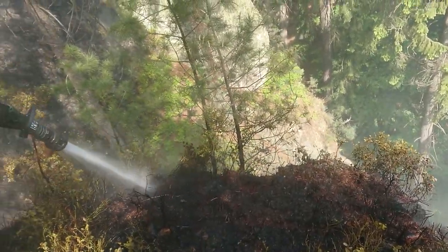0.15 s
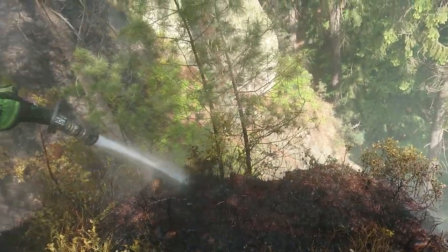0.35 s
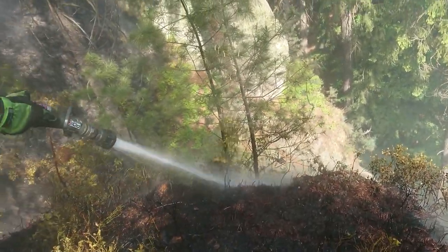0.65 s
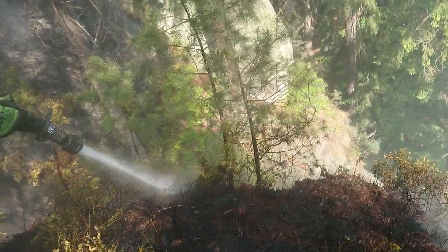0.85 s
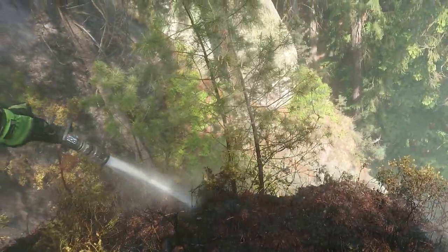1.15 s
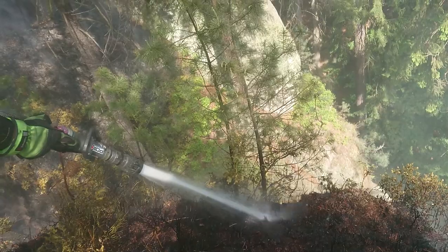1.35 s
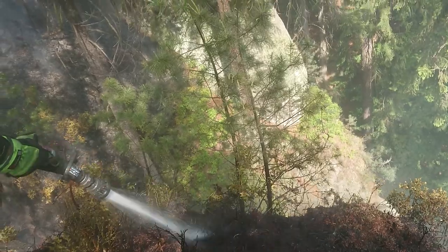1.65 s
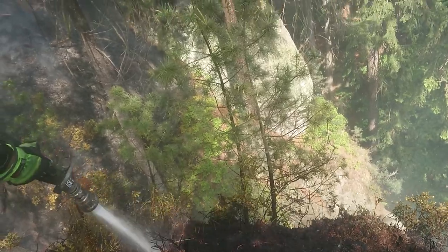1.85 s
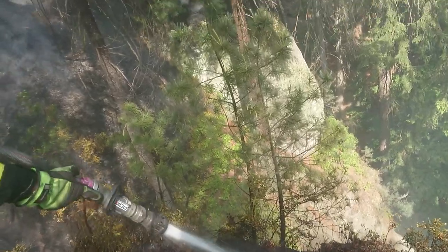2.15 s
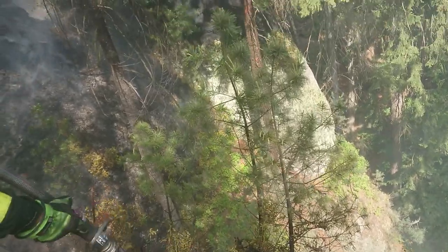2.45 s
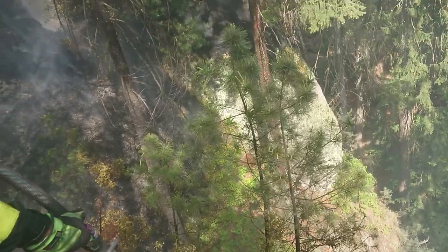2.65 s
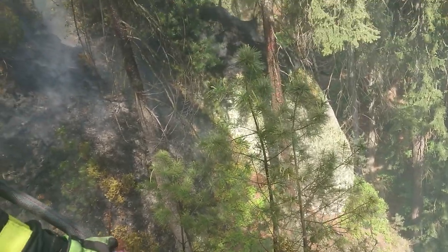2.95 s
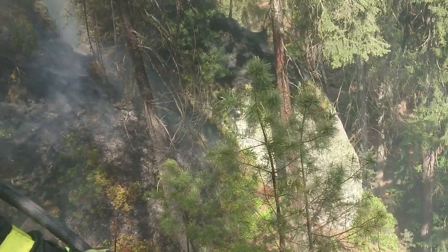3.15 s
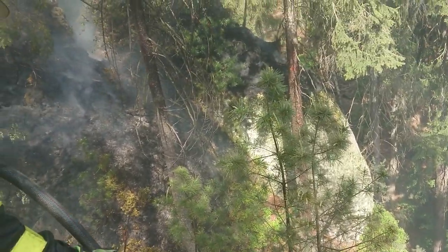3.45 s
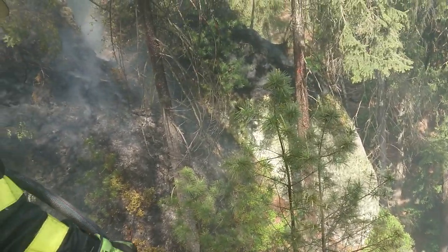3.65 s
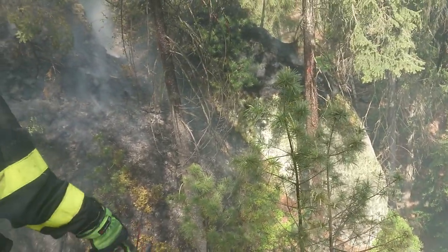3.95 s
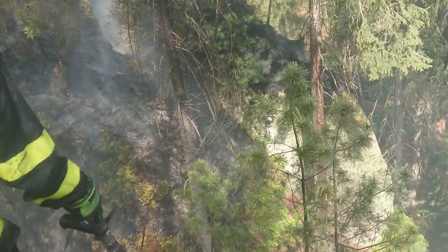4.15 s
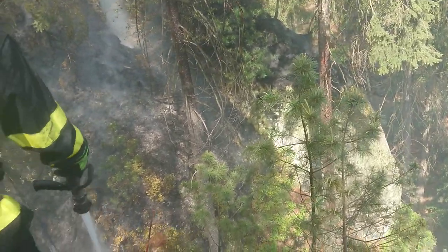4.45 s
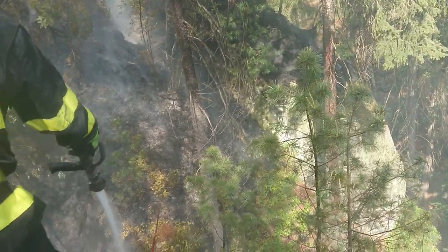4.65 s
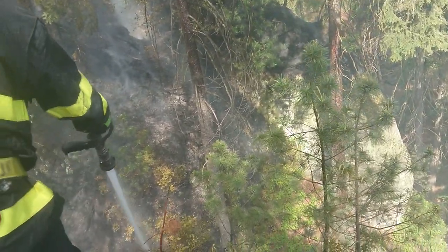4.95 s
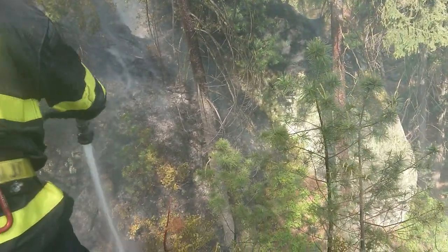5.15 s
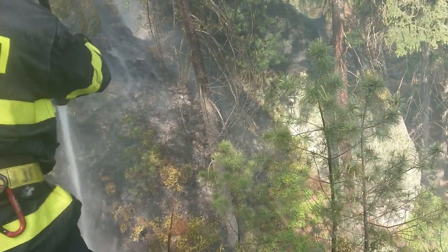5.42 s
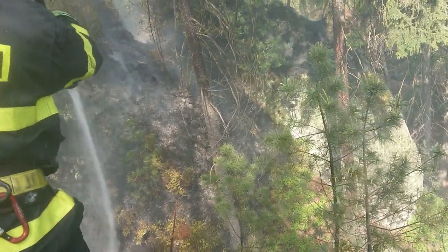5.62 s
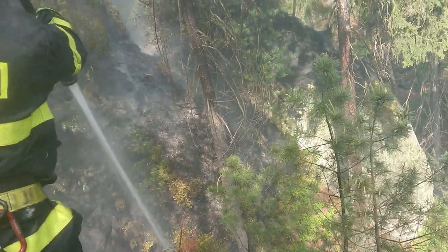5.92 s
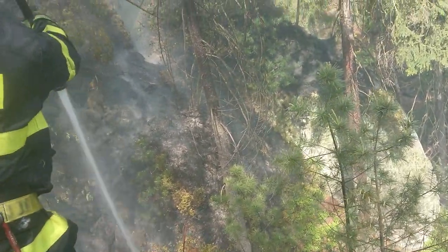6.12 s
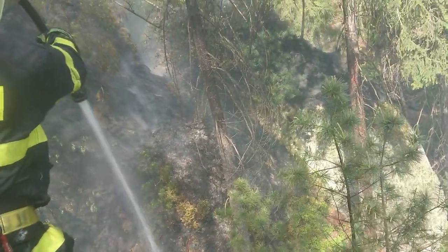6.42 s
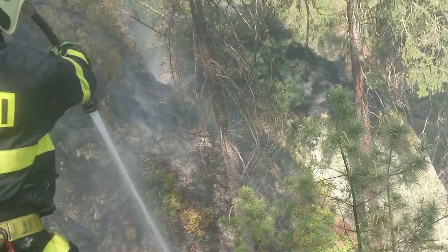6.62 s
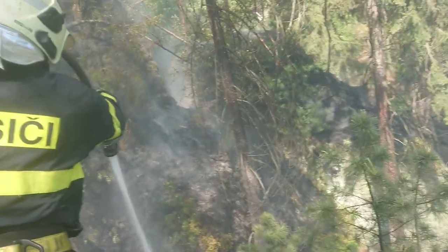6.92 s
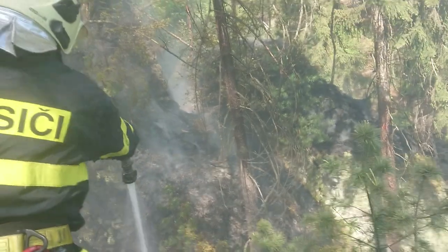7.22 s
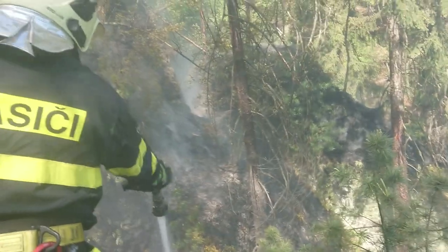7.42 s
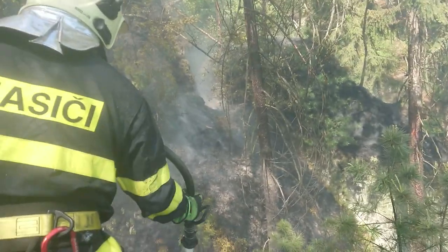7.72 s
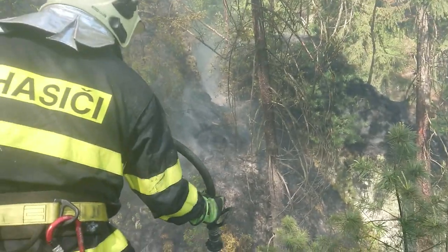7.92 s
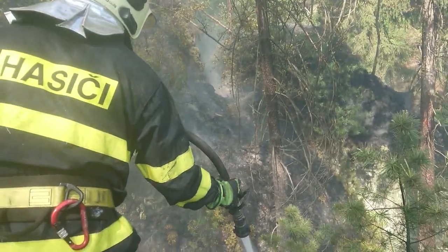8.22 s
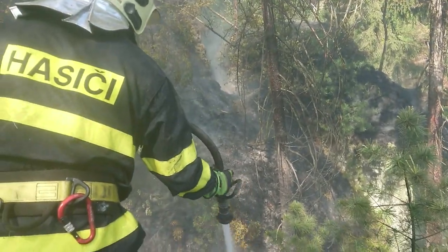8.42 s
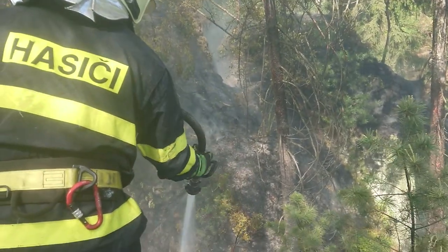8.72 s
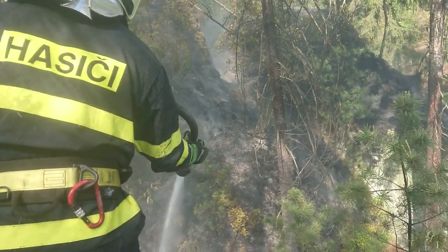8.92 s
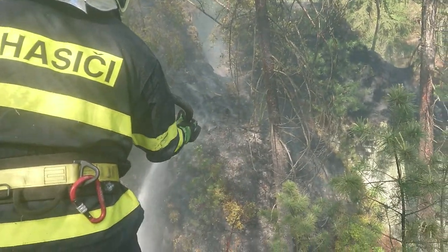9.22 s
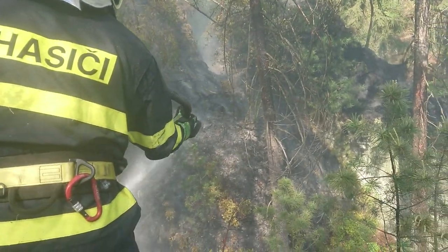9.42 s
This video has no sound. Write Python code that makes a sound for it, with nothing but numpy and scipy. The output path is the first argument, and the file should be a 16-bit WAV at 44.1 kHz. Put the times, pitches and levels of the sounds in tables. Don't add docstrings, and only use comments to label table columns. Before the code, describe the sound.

Dense broadband water rush, loud and close, tears unevenly as a firefighter sweeps the nozzle over mud, ash and brush. Around four seconds the splash recedes downhill, becoming softer and thinner, exposing a steady low motor hum that swells with the breeze. One short hollow knock on the camera housing, then crisp spitting on twigs near eight seconds. Open air, handheld camera, stereo, coloured by its housing.

```python
import sys
import numpy as np
from scipy import signal
from scipy.fft import rfft, irfft, next_fast_len
from scipy.io import wavfile
from scipy.ndimage import uniform_filter1d, map_coordinates

SR = 44100
rng = np.random.default_rng(int(sys.argv[2]) if len(sys.argv) > 2 else 0)


def rack_gain(trim_db):
    fader = np.asarray(trim_db, float)
    return 10 ** (fader / 20)


def unload_audio(sound):
    columns = np.transpose(np.atleast_2d(sound))
    steps = np.round(np.clip(columns, -1, 1) * 32767)
    wavfile.write(sys.argv[1], SR, steps.astype(np.int16))


N = 422037
FRAME = 512


def unit(x):
    return x / np.sqrt(np.mean(np.abs(x) ** 2) + 1e-20)


def columns(rows, at, scale=np.asarray):
    first, *rest = np.transpose(rows)
    return np.array([np.interp(scale(at), scale(first), column) for column in rest])


def log_hz(hz):
    return np.log(np.asarray(hz) + 1)


def wobble(rate, rows=1):
    knots = rng.standard_normal((rows, int(N * rate / SR) + 4))
    coarse = np.arange(0, N + 64, 64)
    curves = [map_coordinates(k, [coarse * rate / SR]) for k in knots]
    return columns(np.transpose([coarse, *curves]), np.arange(N))


def swing(turns, t):
    s, value = np.transpose(turns)
    place = np.interp(t, s, np.arange(len(s)))
    eased = np.floor(place) + .5 - .5 * np.cos(np.pi * (place % 1))
    return np.interp(eased, np.arange(len(s)), value)


def pumps():
    # engine order in Hz, level in dB rms.
    engine_orders = [(42.5, -67), (84, -59), (86.3, -54.5), (93, -55), (168, -61), (170.5, -65.5),
                     (196, -69), (224, -49.5), (252, -58.5), (280, -65.5), (310, -66), (392, -64)]
    # frequency in Hz, level in dB per Hz.
    drone_colour = [(25, -30), (36, -26), (44, 7.5), (100, 1.5), (200, 6), (400, -1), (800, -6.5),
                    (1600, -43)]
    # time in seconds, level in dB.
    breeze = [
        (0, 3),
        (2.5, -0.5),
        (5.2, -.5),
        (5.75, 4),
        (6.3, -2.5),
        (8.8, 1.5),
        (9.3, 4.5),
        (9.57, 3),
    ]
    apart = .45

    hz, db = np.transpose(engine_orders)
    t = np.arange(N) / SR
    drift = wobble(2, rows=len(hz))
    flutter = drift[::-1]
    level = rack_gain(db[:, None] + 1.5 + 0.29 * flutter)
    tones = level * np.sin(2 * np.pi * hz[:, None] * t + 1.17 * drift)

    m = next_fast_len(N)
    colour = rack_gain(columns(drone_colour, np.fft.rfftfreq(m, 1 / SR), log_hz)[0])
    low = unit(irfft(rfft(rng.standard_normal((3, m))) * colour, m)[:, :N])
    drone = rack_gain(-51.5 + columns(breeze, t)) * (low[0] + apart * low[1:])
    return (tones.sum(0) + drone) * rack_gain([[-2.3], [1.9]])


def knock():
    # start in seconds, peak in dB.
    taps = [
        (5.4925, -14.5),
    ]
    # frequency in Hz, level in dB, 60 dB decay in seconds.
    housing = [(373, -10, 0.077), (720, 2.5, 0.03), (1120, 1, .025), (1297, -2, 0.028), (1700, -8, 0.018),
               (2150, -6, 0.02), (2900, -11, .012)]
    out = np.zeros(N + SR)
    t = np.arange(SR // 10) / SR
    ring = sum(-rack_gain(db - 60 * t / t60) * np.sin(2 * np.pi * hz * t) for hz, db, t60 in housing)
    onset = 1 - np.exp(-t / 0.0003)
    for s, db in taps:
        out[round(s * SR):][:len(t)] += rack_gain(db - 5.5) * ring * onset
    return out[:N] * rack_gain([[-3], [2.5]])


def drops(per_s, spread_db, share):
    hit, size = rng.random((2, N))
    bursts = (hit < per_s / SR) * rack_gain(-spread_db * np.log(size + .02)) * rng.choice([-1, 1], N)
    share = np.clip(share, 0, 1)
    return np.sqrt(share) * unit(bursts) + np.sqrt(1 - share) * rng.standard_normal(N)


def twigs():
    # peak time in seconds, level in dB, rise in seconds, fall in seconds.
    rakes = [
        (8.063, -30, .004, .025),
        (8.172, -31, .008, .015),
        (8.455, -31, .025, .02),
        (8.52, -27, .005, .008),
    ]
    t = np.arange(N) / SR
    swell = 0
    for s, db, rise, fall in rakes:
        swell = swell + rack_gain(db) * np.exp(np.where(t < s, (t - s) / rise, (s - t) / fall))
    spit = np.array([drops(per_s=2300, spread_db=8, share=.4) for _ in range(2)])
    bright = signal.butter(2, 5000, "high", fs=SR, output="sos")
    return swell * signal.sosfilt(bright, spit)


def patches(shape, depth_db, bins, frames):
    field = uniform_filter1d(rng.standard_normal(shape), bins, 0)
    return rack_gain(depth_db * unit(uniform_filter1d(field, frames, 1)))


def loudness_db(t):
    # time in seconds, level in dB, soft ground in dB.
    flow = [(0, -22, 1), (.4, -30, 1), (1, -28, 2), (1.6, -25.5, -1.5), (2.2, -24.5, 0), (3, -25, -0.5),
            (3.8, -23, 2), (4.2, -30, 1.5), (4.45, -35, 1), (4.7, -36.5, -6), (5.3, -38, 0.5),
            (6.2, -37.5, 4.5), (7, -38, 4), (7.6, -37, 1.5), (8.3, -32.5, -2), (8.8, -38, -1.5),
            (9.2, -38, 1), (9.57, -36, -2.5)]
    # soil thud, splash, spatter and mist, each in dB.
    near_balance = [-12, .5, -0.3, 2.5]
    far_balance = [-10, -0.3, -5, -3]
    recedes = [4.15, 4.6]
    # centre in seconds, strength in dB, half length in seconds.
    digs = [(.307, 8, 0.069), (.815, 2.5, .02), (1.08, 7, 0.015), (1.212, 3, 0.049), (1.382, 4, 0.023),
            (1.492, 4.5, 0.041), (1.672, 3, .062), (1.933, 5.5, 0.05), (2.139, 4.5, .02), (2.385, 1, .014),
            (2.5, 4, 0.0078), (2.65, 1, 0.067), (3.08, 2, 0.15), (3.544, 3, .02), (3.721, 2.3, 0.0091),
            (3.9, 2, .028), (4.13, 4, 0.024), (5.004, 1, 0.14), (8.786, 2, .038)]
    shatters = [(0.536, 5.5, 0.06), (.749, 3, .06), (1.347, 3.5, 0.066), (1.633, 1.5, 0.065),
                (2.1, 1.5, 0.069), (2.767, 1, .017), (2.84, 4, 0.049), (3.706, 0, .018), (4.163, 2, .016),
                (4.42, 6.5, 0.13), (5.424, 3.5, .016), (8.09, 3, .02), (8.19, 1, .016), (8.45, 4, 0.046),
                (9.18, 1, .03)]
    hides = [(-.019, 6, .068), (1.08, 8.5, 0.038), (1.492, 3.5, 0.038), (1.927, 8, 0.068), (2.835, 8, 0.04),
             (3.38, 2, 0.047), (4.012, 3, 0.04), (4.289, 6, 0.013), (4.476, 5, 0.034), (5.408, 1.5, .09),
             (5.455, 1, .05), (6.206, 2.5, 0.16), (8.298, 4, 0.066), (9.073, 1.5, 0.025)]
    smothers = [(0.548, 8, .038), (.776, 6, 0.029), (1.02, -2.5, 0.022), (1.318, 6.5, .03),
                (2.178, 1.5, .03), (2.312, 5.5, .035), (2.435, -2.5, .02), (2.618, 3.9, .08),
                (2.713, 2.5, .018), (3.017, 3.5, 0.12), (3.633, 4.5, 0.031), (3.647, 3.5, 0.23),
                (3.853, 4.5, 0.045), (4.126, 2.5, .026), (4.377, 3, 0.021), (4.68, 2.5, .12),
                (7.55, 0.5, .1), (7.78, -1, .08), (9.304, 4, 0.039)]
    dig_share = [0.97, 1.12, 0.27, -0.15]
    shatter_share = [0.076, 0.29, 1.36, 1.14]
    hide_share = [-0.65, -0.83, -0.85, -0.78]
    smother_share = [0.067, -0.19, -0.48, -1.17]

    level_db, soft_db = columns(flow, t)
    far = np.interp(t, recedes, [0, 1])
    sizes_db = level_db + np.outer(near_balance, 1 - far) + np.outer(far_balance, far)
    sizes_db = sizes_db + np.outer([1, 0, 0, 0], soft_db)
    meets = ((dig_share, digs), (shatter_share, shatters), (hide_share, hides), (smother_share, smothers))
    for share, rows in meets:
        bumps_db = sum(db * np.exp(-.5 * ((t - s) / half) ** 2) for s, db, half in rows)
        sizes_db = sizes_db + np.outer(share, bumps_db)
    return sizes_db


def ports(hz, t):
    # frequency in Hz, left in dB, right in dB.
    near_colour = [(170, -7.5, -2), (570, -10, -4.5), (1260, -13.5, -5), (1975, -10.5, 5.5),
                   (3260, -7.5, -2.5), (4330, -0.5, -4.5), (4640, 0.5, -4), (5100, -11, -5.5),
                   (6270, -6.5, -5.5), (7640, -8.5, -0.5), (10000, -7, -7), (10800, -4, -6),
                   (13300, -1, 0.5), (16400, -12, -4)]
    far_colour = [(170, -15, -6.5), (510, -13.5, -6.5), (1090, -11.5, -1), (1940, -3.5, 11),
                  (2840, -7.5, 0.5), (3370, -7, -3), (4690, -2.5, -12.5), (5470, -16.5, -8),
                  (6440, -10.5, -2.5), (8050, -9.5, -6.5), (9600, -6.5, -8), (13200, 1.5, -0.5),
                  (14600, -3, -4.5), (16600, -9, -3)]
    # frequency
    # in Hz, left lead in rad, likeness from 0 to 1.
    near_phase = [(170, -.4, .97), (700, -.7, .96), (1380, -.9, .8), (2070, -.6, .68), (2930, -1.1, .62),
                  (4130, -2.4, .7), (5100, -2.8, .86), (5550, -2.9, .86), (5850, -.2, .74),
                       (7500, 0, .52), (9700, .4, .6), (11500, 1, .55), (13000, .7, .55),
                       (15700, -1.2, .45)]
    far_phase = [(170, -.7, .96), (700, -1, .78), (1400, -1.1, .8), (1810, -.7, .72), (2300, -1, .62),
                 (2800, -.5, .66), (3550, -1.5, .8),
                 (3900, -1.4, .6), (4300, -.6, .3), (5340, 1, .45), (8000, .8, .33), (9000, -1, .28),
                      (13300, -4.5, .3), (15700, -5.5, .28)]
    leaves = [4.15, 4.35]
    # frequency in Hz, left in dB, right in dB, extra lead in rad.
    turned_colour = [(700, 0, -1, .2), (1200, 5, 0, 0), (1900, -1, -1, .4), (2760, 5, 0, .6),
                     (3400, 0, -2, .7), (5000, -1, 4, -.2), (6400, -1, 0, -2.5), (7500, 0, -6, -2.9),
                     (9000, 0, -5, -5.2), (10800, -1, 4, -6), (13200, 2, -6, -6.9), (15500, 1, 0, -8.5)]
    # fade in from, full from, full until, gone at, in seconds.
    turned_times = [2.9, 2.99, 4.03, 4.12]
    # time in seconds, left port's lead in ms.
    near_turns = [(-.1, .125), (.27, .177), (.69, .077), (1.07, .191), (1.5, .058), (1.94, .189),
                  (2.33, .049), (2.72, .153), (3.06, -.056), (3.5, .083), (3.86, -.047), (4.4, .21)]
    far_turns = [(4.2, .185), (4.75, .226), (5.03, .209), (5.35, .246), (6.3, .268), (6.85, .231),
                 (7.25, .244), (8.3, .074), (9.1, .175), (9.6, .176)]
    # frequency in Hz, width in Hz, left dip in dB, right dip in dB.
    still_dips = [(480, 30.4, -15, -15), (1320, 164, -3, 1.5)]
    # time in seconds, left Hz, left dB, right Hz, right dB.
    moving_dips = [(4.2, 2300, 4, 1700, 1), (4.7, 2480, -7, 1700, 1), (5.4, 2300, -8, 1730, 0.5),
                   (6, 2160, -20, 1720, -4), (7, 1990, -11, 1700, -1.5), (7.6, 2150, -8, 1880, -6),
                   (8.3, 2290, 1, 1880, -9), (8.8, 2450, -4, 2150, -11), (9.57, 2300, -4, 1920, -6)]
    # time in seconds, tightness (1 = usual).
    tight = [(.3, 1.2), (.55, .93), (1.1, 1.05), (1.9, .88), (2.6, 1.08), (3.1, .92), (3.5, 1.08),
             (3.85, .88), (4.35, 1.1), (4.6, .92), (5, 1.05), (5.9, .95), (6.9, 1.08), (7.3, .85),
             (7.65, 1), (8.3, .9), (9, 1.04), (9.3, .97)]
    tremor_ms, tremor_per_s = .009, 9
    step_hz, step_rad, climb_hz_per_ms, rest_ms = 5700, 2.7, 6500, .145

    away = np.interp(t, leaves, [0, 1])

    def fade(near, far):
        near_part = columns(near, hz, log_hz)[:, :, None] * (1 - away)
        return near_part + columns(far, hz, log_hz)[:, :, None] * away

    def step(at_hz, width_hz):
        return np.clip((hz[:, None] - at_hz) / width_hz + .5, 0, 1)

    def dip(at_hz, width_hz):
        return np.exp(-.5 * ((hz[:, None] - at_hz) / width_hz) ** 2)

    left_db, right_db = fade(near_colour, far_colour)
    lead, alike = fade(near_phase, far_phase)
    turned = columns(turned_colour, hz, log_hz)[:, :, None] * np.interp(t, turned_times, [0, 1, 1, 0])
    left_db, right_db, lead = left_db + turned[0], right_db + turned[1], lead + turned[2]

    lead_ms = (1 - away) * swing(near_turns, t) + away * swing(far_turns, t)
    lead_ms = lead_ms + tremor_ms * np.interp(t * SR, np.arange(N), wobble(tremor_per_s)[0])
    lead = lead + 2 * np.pi * hz[:, None] * lead_ms / 1000

    climbed_hz = step_hz + climb_hz_per_ms * np.clip(rest_ms - lead_ms, 0, .1)
    facing = (1 - away) * np.interp(t, turned_times, [1, 0, 0, 1])
    lead = lead + step_rad * facing * (step(climbed_hz, 700) - step(step_hz, 300))

    for at_hz, width_hz, left_dip, right_dip in still_dips:
        left_db = left_db + left_dip * dip(at_hz, width_hz)
        right_db = right_db + right_dip * dip(at_hz, width_hz)
    left_hz, left_dip, right_hz, right_dip = columns(moving_dips, t)
    left_db = left_db + left_dip * dip(left_hz, width_hz=100)
    right_db = right_db + right_dip * dip(right_hz, width_hz=175)
    alike = np.clip(alike ** (swing(tight, t) ** -3), 0, .98)
    return rack_gain(left_db), rack_gain(right_db), lead, alike


def jet():
    size_borders = [200, 1200, 3500, 9000, 15800]
    surge = rack_gain(0.27 * wobble(14)[0] + 0.88 * wobble(45)[0])
    water = np.array([drops(per_s=3000, spread_db=2.5, share=.2) for _ in range(3)]) * unit(surge)
    hz, t, z = signal.stft(water, SR, nperseg=FRAME)
    z = z * unit(patches(z.shape[1:], depth_db=1.5, bins=4, frames=14))
    left, right, lead, alike = ports(hz, t)

    centre = (left ** 2 + right ** 2 + 2 * alike * left * right * np.cos(lead)) / 4
    borders = np.array(size_borders)
    bands = zip(borders, borders[1:])
    power = np.array([centre[(hz >= a) & (hz < b)].sum(0) / len(hz) for a, b in bands])
    gain_db = loudness_db(t) - 10 * np.log10(power)
    middle_hz = np.sqrt(borders[1:] * borders[:-1])
    blend = np.array([np.interp(log_hz(hz), log_hz(middle_hz), row) for row in np.eye(4)])
    low_cut = hz ** 2 / (hz ** 2 + 220 ** 2)
    z = z * rack_gain(blend.T @ gain_db) * low_cut[:, None]

    turn = np.exp(.5j * lead)
    common = np.sqrt(alike) * z[0]
    alone = np.sqrt(1 - alike) * z[1:]
    pair = np.array([left * (common * turn + alone[0]), right * (common / turn + alone[1])])
    return signal.istft(pair, SR, nperseg=FRAME)[1][:, :N]


def scene():
    return jet() + rack_gain(7.0) * twigs() + knock() + pumps()


def starve(pair, below_db):
    mid_side = np.array([pair[0] + pair[1], pair[0] - pair[1]]) / 2
    hz, t, z = signal.stft(mid_side, SR, nperseg=FRAME)
    power = uniform_filter1d(np.abs(z) ** 2, size=5, axis=1)
    power = uniform_filter1d(power, size=9, axis=2)
    treble = (hz > 3000) & (hz < 11000)
    weak = (power < power[::-1] * rack_gain(2 * below_db)) & treble[:, None]
    mid, side = signal.istft(z * ~weak, SR, nperseg=FRAME)[1][:, :N]
    return np.array([mid + side, mid - side])


def band_limit(x):
    return signal.sosfilt(signal.butter(12, 17090, fs=SR, output="sos"), x)


def record(dry):
    ceiling, top_hz = .95, 15850
    soft = dry / (1 + np.abs(dry / ceiling) ** 4) ** .25
    m = next_fast_len(N)
    passed = np.fft.rfftfreq(m, 1 / SR) < top_hz
    limited = irfft(rfft(soft, m) * passed, m)[:, :N]
    mix = starve(limited, below_db=-6.8)
    return band_limit(mix)


dry = scene()
out = record(dry)
unload_audio(out)
```